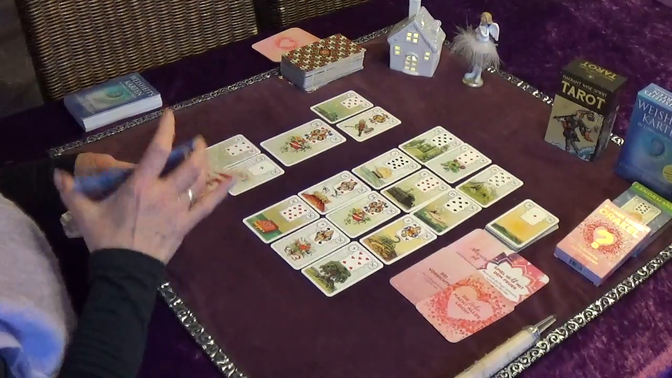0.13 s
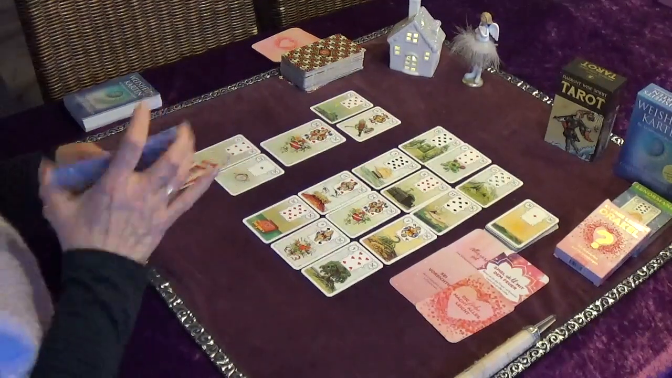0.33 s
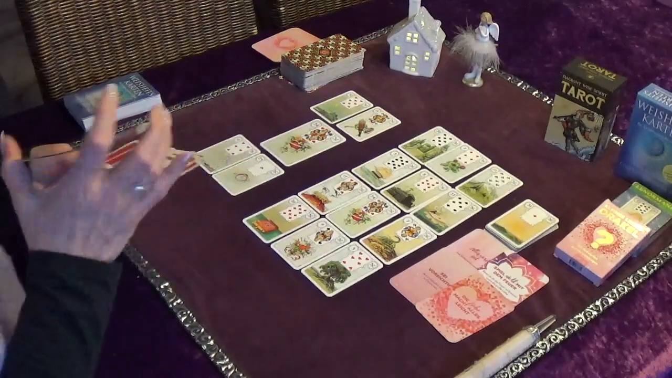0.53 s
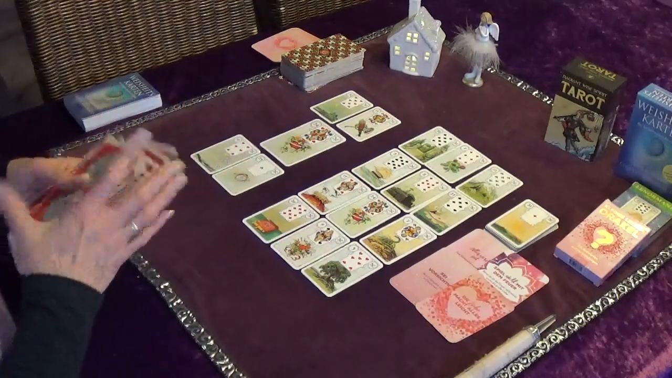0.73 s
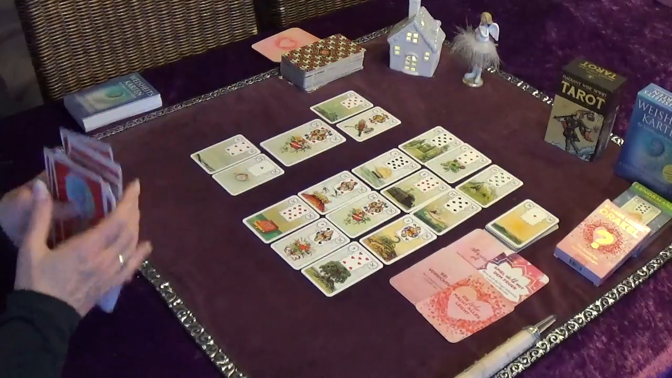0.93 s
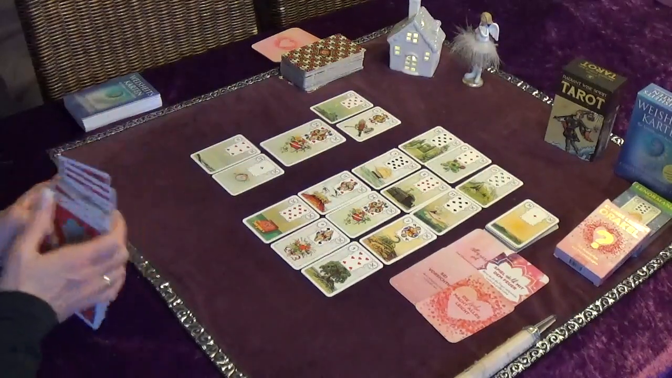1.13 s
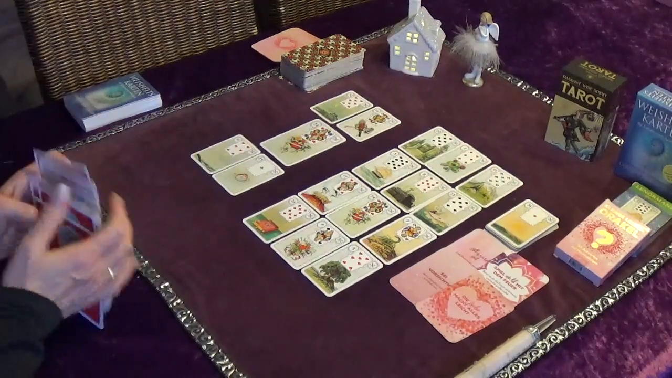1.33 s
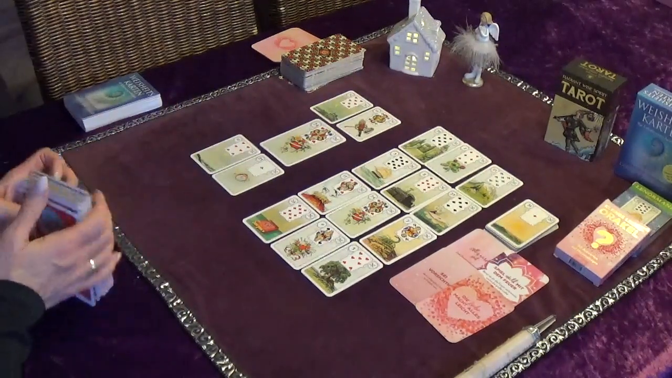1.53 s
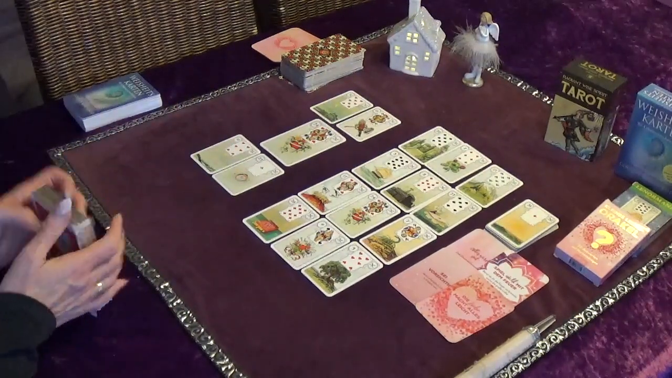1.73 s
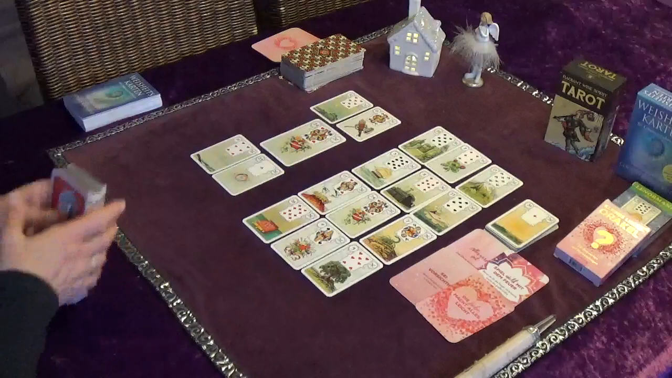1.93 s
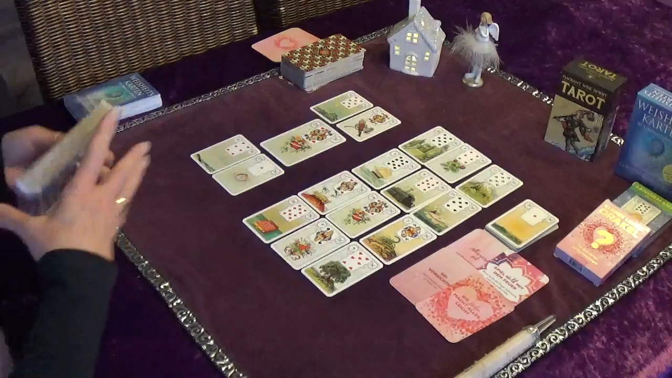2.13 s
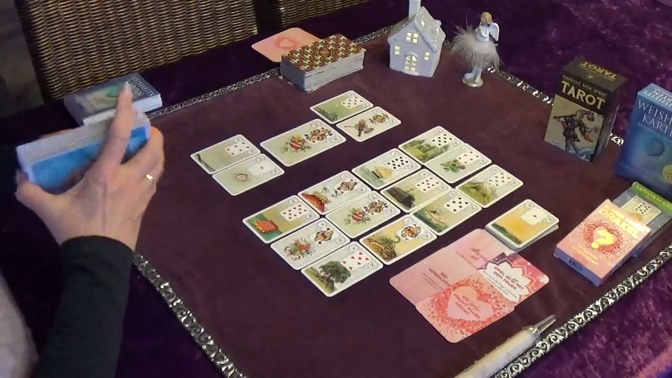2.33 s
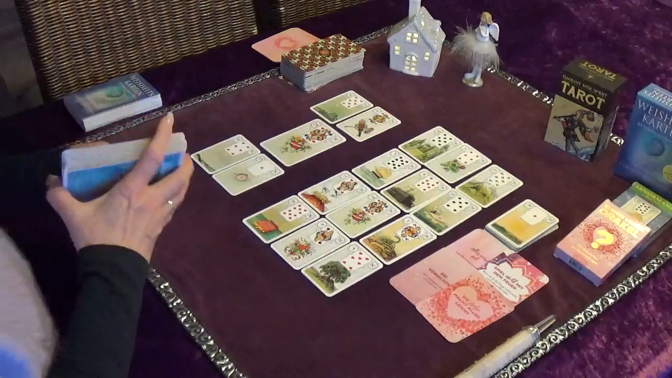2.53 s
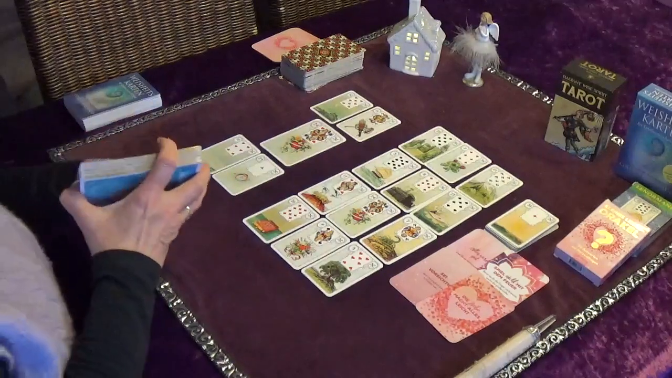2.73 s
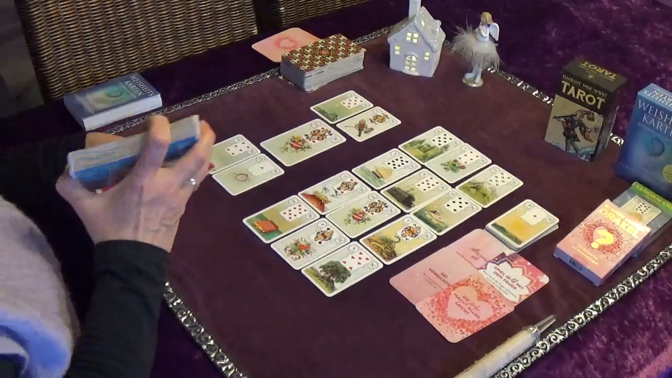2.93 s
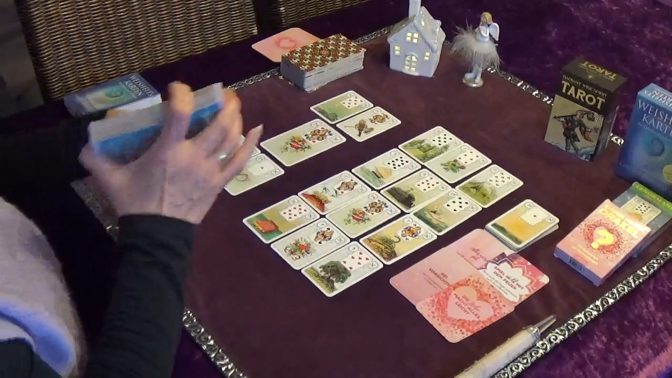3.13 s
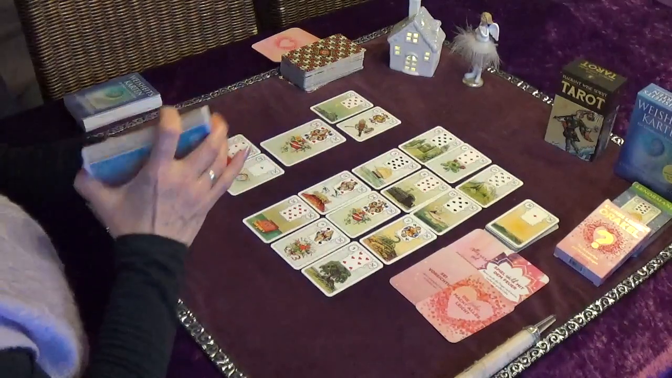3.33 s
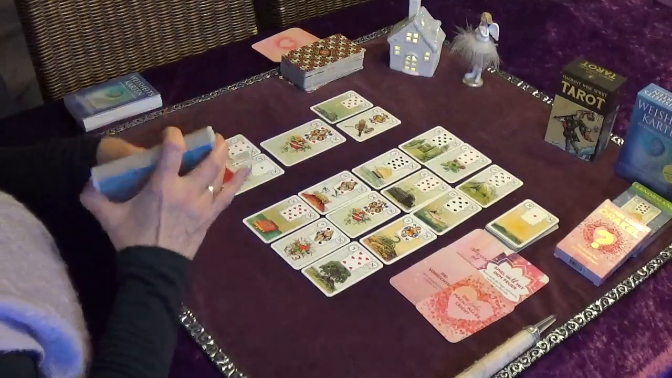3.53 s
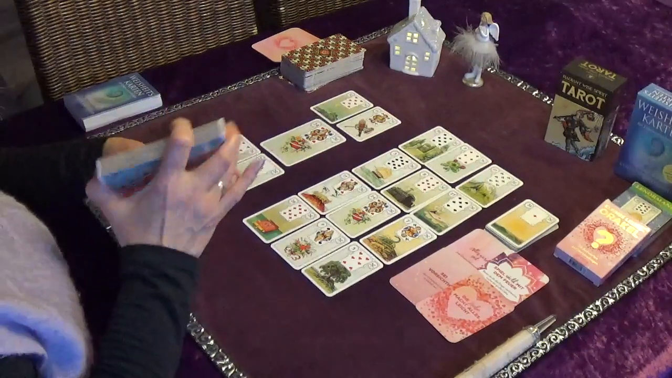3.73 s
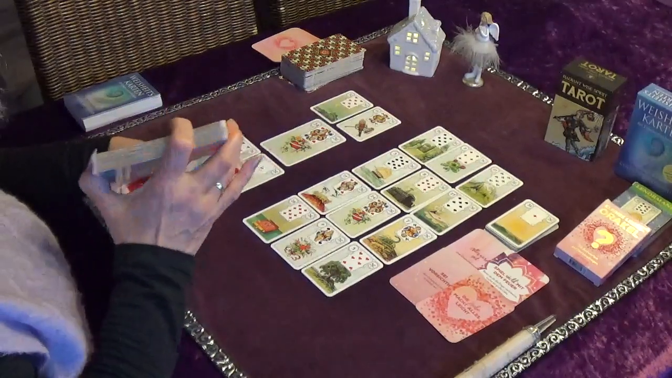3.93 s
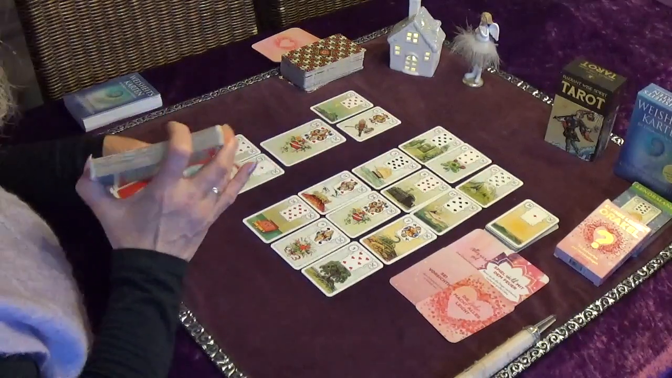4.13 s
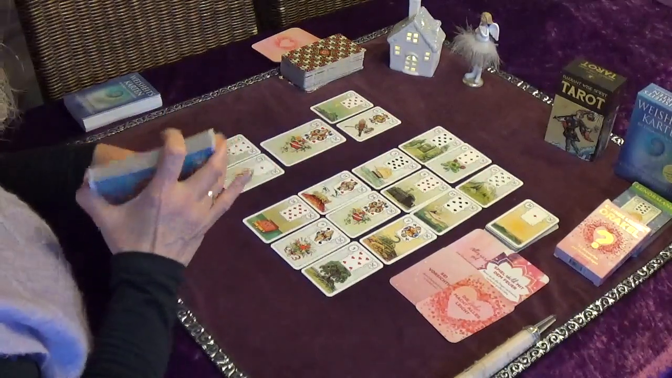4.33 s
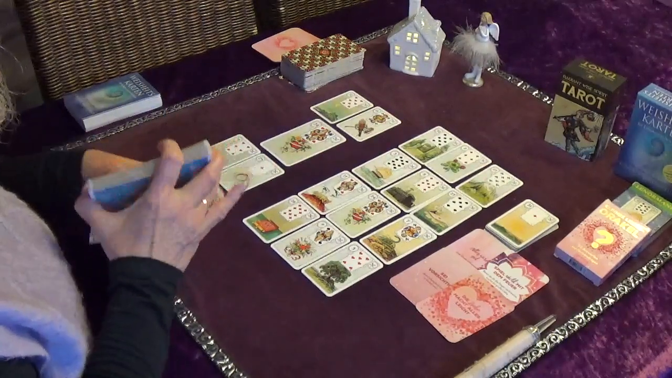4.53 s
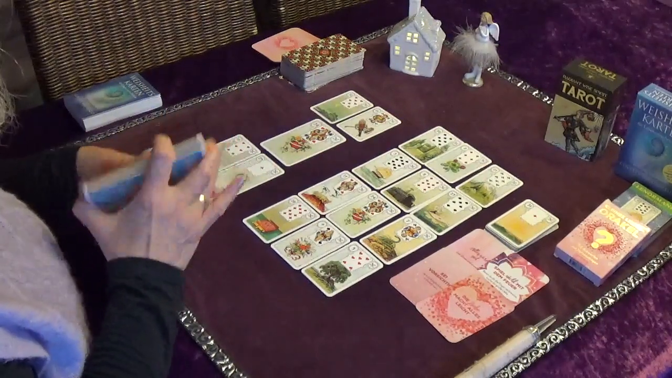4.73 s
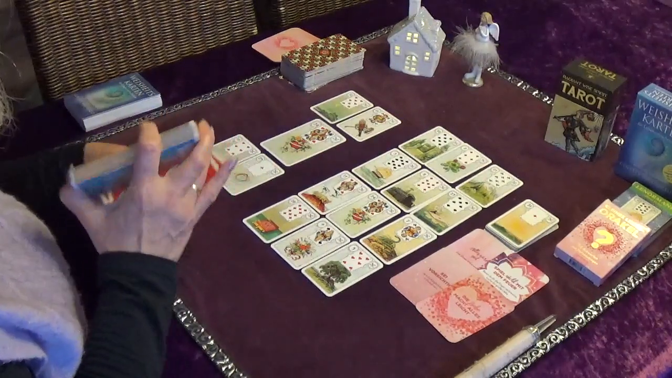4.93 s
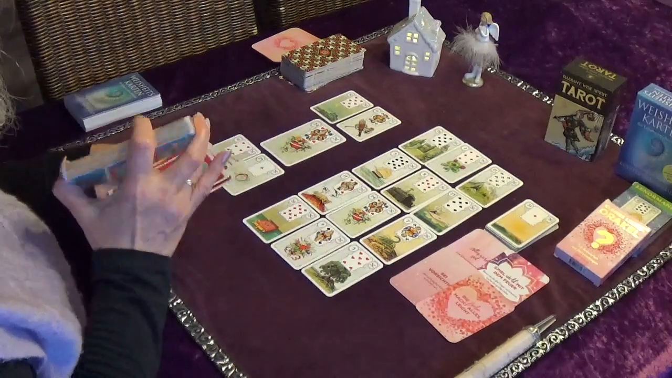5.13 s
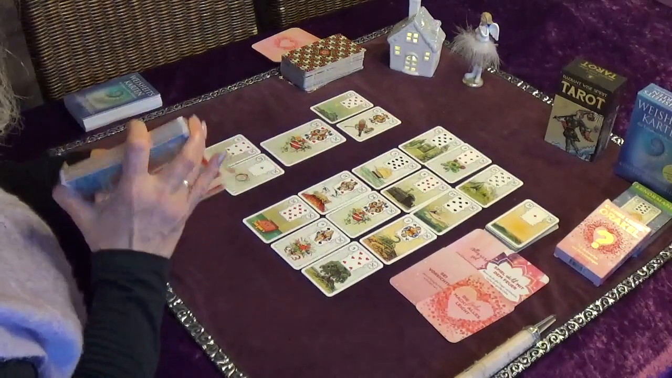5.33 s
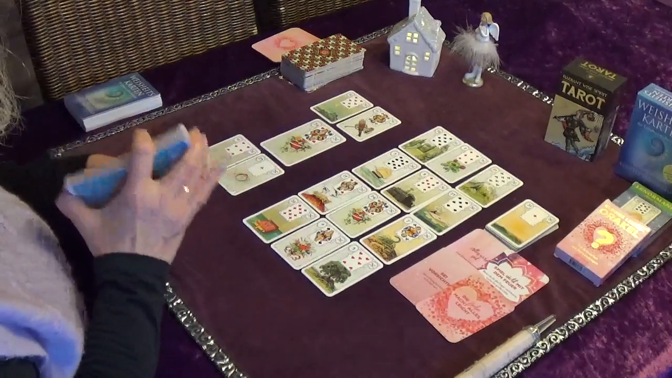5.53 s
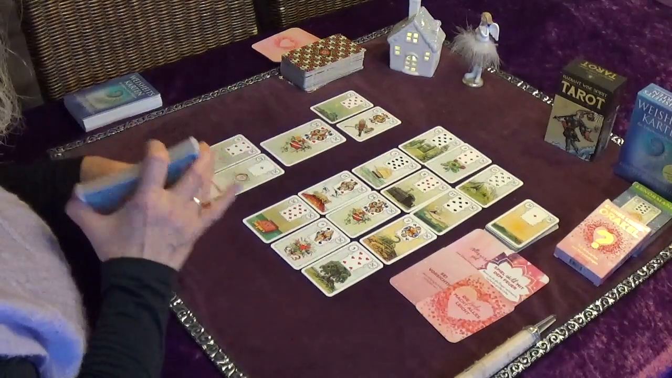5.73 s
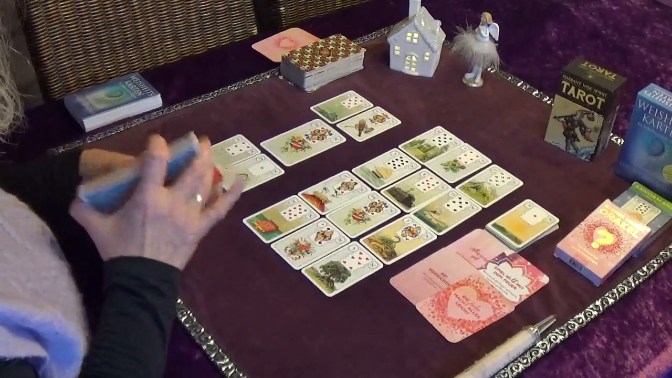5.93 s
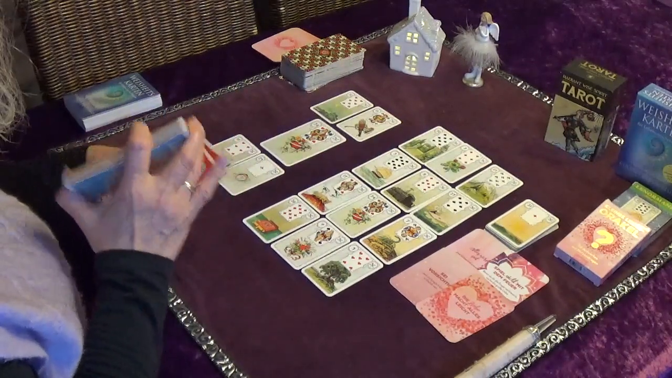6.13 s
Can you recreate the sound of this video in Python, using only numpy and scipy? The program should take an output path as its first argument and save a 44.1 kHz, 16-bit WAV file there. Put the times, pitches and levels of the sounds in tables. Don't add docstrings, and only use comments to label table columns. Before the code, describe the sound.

Hands shuffle a deck of cards overhand with crisp papery snaps, pause to knock it square on a table, then shuffle again in steady rhythm.

```python
import sys
import numpy as np
from scipy import signal
from scipy.fft import rfft, irfft, next_fast_len
from scipy.io import wavfile
from scipy.ndimage import map_coordinates

SR = 44100
rng = np.random.default_rng(int(sys.argv[2]) if len(sys.argv) > 2 else 0)


def invert_db(level):
    return 10 ** (np.asarray(level, dtype=float) / 20)


def master(y):
    cut = np.clip(np.atleast_2d(y).T, -1, 1)
    pcm = np.round(cut * 32767)
    wavfile.write(sys.argv[1], SR, pcm.astype(np.int16))


N = 276590

# frequency in Hz, level in dB per Hz.
HISS_SPECTRUM = [(12, -21), (20, -3.5), (59, 0), (77, -4.5), (165, -13), (199, -0.5), (221, -8),
                 (463, -10.5), (542, -16.5), (3270, -21), (3830, -24), (7600, -25.5), (11000, -29.5),
                 (14300, -59), (22000, -120)]
# frequency in Hz, 60 dB decay time in seconds.
ROOM_DECAY = [(100, 1), (300, 0.49), (800, 0.49), (2000, 0.4), (5000, 0.34), (10000, 0.27)]
# frequency in Hz, side level relative to mid in dB.
DIFFUSE_WIDTH = [(60, -17), (200, -17), (350, -15), (630, -9), (1100, -6), (2000, -7), (4000, -7.5),
                 (10000, -5.5)]
# frequency in Hz, swell in seconds, 60 dB decay in seconds, level in dB.
ROOM_MODES = [(109.6, 0.03, 0.32, -17), (156.6, 0.02, 0.63, -28.5)]
# frequency in Hz, width in Hz, level in dB.
TABLE_MODES = [(225.6, 14, 5), (326, 17, 9.5), (490, 29, 3), (687, 49, 11), (996, 7.7, 4), (1252, 49, 8),
               (1523, 18, -1.5), (1642, 19, 8), (1900, 27, -19), (3100, 50, -14)]
# frequency in Hz, width in Hz, level in dB.
PALM_MODES = [(205, 137, -10.5), (438, 64, 1), (732, 120, -5), (1230, 132, -1)]
# frequency in Hz, level in dB per Hz.
KNOCK_SPECTRUM = [(60, -26), (120, -23), (300, -8), (700, -6), (1500, 5.5), (2200, 3.5), (3200, -4),
                  (4500, -21), (8000, -55)]
# frequency in Hz, level in dB per Hz.
CARD_SPECTRUM = [(290, -55), (500, -40), (547, 2.5), (786, -30), (883, -11), (1300, -10), (3220, -4),
                 (3960, -5), (8280, -7), (11000, -15), (14300, -69), (22000, -120)]
# frequency in Hz, level in dB per Hz.
SCRAPE_SPECTRUM = [(150, -12), (300, 5), (500, -17.5), (900, -4.5), (1800, -2.5), (2800, -19), (4500, -17)]
# start in seconds, peak in dB, early corner in dB relative to the peak,
# loss per packet in dB, thud below 500 Hz in dB.
KNOCKS = [
    (0.991, -15, -34, 1, 8),
    (1.398, -3, -23.5, 2, -0.5),
    (1.69, -4, -8.5, 1.57, 0),
]
PACKET_DELAYS = [0, .016, .039, .06, .075]
# time in seconds, peak in dB, card ring in Hz,
# draw length in seconds, draw hiss in dB.
DROPS = [(0.264, -21, 2420, 0.051, -34.5), (0.6887, -8, 4610, 0.0083, -38), (2.9305, -14, 2420, 0.022, -32),
         (3.1942, -15, 2880, 0.037, -33.5), (3.3513, -14, 2570, 0.0062, -45),
         (3.688, -8, 3200, 0.017, -24.5), (3.9225, -17, 1290, 0.016, -23.5),
         (4.1788, -9.5, 2700, 0.015, -24.5), (4.409, -7, 2380, 0.015, -21),
         (4.6587, -10, 2130, 0.011, -24.5), (4.9093, -8, 2210, 0.023, -27),
         (5.1542, -6.5, 2450, 0.022, -25.5), (5.382, -9, 2600, 0.024, -26),
         (5.6197, -12.5, 2260, 0.02, -21.5), (5.8695, -11, 2300, 0.026, -23), (6.107, -7, 2450, 0.011, -22)]
# time in seconds, peak in dB, card ring in Hz,
# rub in dB, glide in dB.
CATCHES = [(0.1221, -7, 3160, -24.5, -46), (0.3815, -6, 7660, -29.5, -36), (0.6569, -25, 1390, -32.5, -56),
           (3.0618, -18.5, 3350, -26, -45), (3.3023, -6.5, 4200, -31.5, -53),
           (3.5482, -9.5, 3840, -23, -34.5), (3.8011, -18, 2390, -31, -40), (4.0589, -4, 1580, -27, -39),
           (4.29, -13, 9800, -37, -44.5), (4.5431, -6.5, 3800, -22.5, -38), (4.7819, -11, 2680, -33.5, -37),
           (5.0263, -12.5, 5300, -21.5, -31.5), (5.2731, -9.5, 1440, -26.5, -54),
           (5.5038, -9, 5350, -26.5, -38), (5.7405, -7, 3540, -24.5, -39), (6.0112, -6, 2940, -39, -35.5),
           (6.2259, -22, 1460, -33, -30)]
# time in seconds, peak in dB, card ring in Hz,
# ring relative to the peak in dB.
REAR_EDGES = [(0.6978, -7.5, 2340, -1.5), (1.7053, -26, 3220, 21.5), (2.9362, -25.5, 2800, 14.5),
              (2.9383, -23.5, 910, 8.5), (3.2003, -29, 2700, 19), (3.211, -26, 5000, -9),
              (3.9267, -13.5, 1140, -3), (4.1879, -8.5, 1220, -11), (4.1936, -15.5, 3670, 6.5),
              (4.4167, -12, 2200, 2.5), (4.6663, -6, 6500, 4), (4.6723, -22, 5530, -4),
              (4.9163, -5.5, 1105, -6.5), (5.162, -5.5, 3360, -7), (5.3884, -14, 2780, -2),
              (5.6273, -4, 1350, -2.4), (5.8785, -9, 3250, -2.5), (6.1132, -6, 3540, -9),
              (6.119, -19, 2580, -7)]
# time in seconds, peak in dB, card ring in Hz,
# palm slap relative to the peak in dB.
FLICKS = [(0.119, -21, 4600, -26), (0.1493, -8.5, 6500, -21), (0.2088, -35, 6950, -26),
          (0.3939, -10, 4460, -35), (0.6689, -16.5, 7920, -20), (0.7333, -32.5, 2340, -1.5),
          (3.0778, -26, 3450, -2.5), (3.1093, -18.5, 4870, -35), (0.6924, -15, 2100, -5.5),
          (3.3767, -14.5, 1260, -31), (3.554, -7.5, 2730, -10), (3.8215, -10.5, 1760, -13.5),
          (4.0769, -25, 1120, -18), (4.1656, -21, 2540, -27), (4.2935, -21, 3270, -11),
          (4.3035, -22.5, 1410, -18), (4.3223, -25, 2330, -8.5), (4.794, -9.5, 1400, -22),
          (4.8219, -19.5, 2680, -17), (5.0576, -17.5, 1370, -15.5), (5.2571, -22, 2610, -16),
          (5.286, -4.5, 2310, -22), (5.3097, -31, 2780, -13), (5.375, -10.5, 3400, -28),
          (5.5007, -22, 2630, -26), (5.0206, -26, 7100, -14), (5.5262, -12.5, 4800, -15.5),
          (5.7708, -15, 4860, -22), (5.9805, -18.5, 1380, -13.5), (6.2583, -22.5, 2850, -10.5)]
# time in
# seconds, peak in dB, card ring in Hz.
TICKS = [(1.01, -25, 2430), (1.1186, -30, 3000), (1.2754, -40, 9300), (1.2832, -36, 7750),
         (1.398, -15.5, 2900), (1.857, -30, 5000), (0.5193, -14.5, 1740), (2.0725, -37, 6030),
         (2.2784, -35.5, 5000), (2.5164, -48, 1150), (2.7202, -41.5, 6140), (2.845, -40, 460)]
# start in seconds, length
# in seconds, hiss in dB, hiss colour in Hz.
BRUSHES = [(0.201, 0.015, -24.5, 5370), (0.497, 0.017, -27, 6000), (0.866, 0.016, -32.5, 5400),
           (0.904, 0.038, -32.5, 6100), (0.996, 0.056, -36.5, 2550), (1.046, 0.019, -37, 9200),
           (1.109, 0.057, -39, 3100), (1.262, 0.019, -46, 8100), (1.307, 0.032, -49, 9000),
           (1.4, 0.0063, -30, 3400), (1.456, 0.034, -35.5, 6000), (1.613, 0.026, -51.5, 6000),
           (1.683, 0.02, -39, 3000), (1.796, 0.036, -44.5, 6000), (1.846, 0.049, -44, 6000),
           (2.038, 0.029, -45, 8800), (2.063, 0.015, -46, 4580), (2.281, 0.012, -42, 5330),
           (2.337, 0.025, -52, 6200), (3.095, 0.025, -32, 4760), (3.631, 0.021, -29, 8200),
           (3.809, 0.02, -20, 6460), (4.054, 0.0071, -25, 7560), (5.042, 0.014, -23, 9500),
           (5.844, 0.028, -22, 9300), (5.513, 0.021, -25.5, 6400), (6.212, 0.017, -28.5, 6800),
           (5.57, 0.018, -45, 8700), (5.972, 0.0093, -26, 3860)]
# start in seconds, length in seconds, level in dB, colour in Hz.
DRAGS = [(0.129, 0.035, -31, 1360), (0.274, 0.045, -48, 2300), (0.521, 0.052, -42, 1730),
         (0.7, 0.048, -37, 2100), (0.749, 0.19, -43.5, 2230), (1.894, 0.11, -46.5, 1460),
         (2.802, 0.09, -42, 2320), (2.942, 0.03, -50, 950), (3.554, 0.047, -25, 1960),
         (3.834, 0.05, -30, 1900), (4.069, 0.041, -32, 1710), (4.562, 0.0086, -27, 2010),
         (5.268, 0.0086, -23, 1410), (5.295, 0.06, -29.5, 1920)]


def unit(x):
    return x / np.sqrt(np.mean(x ** 2) + 1e-20)


def along(points, hz):
    f, value = np.transpose(points)
    return np.interp(np.log(hz + 1), np.log(f + 1), value)


def filtered(x, response):
    size = next_fast_len(x.shape[-1] + 8192)
    spectrum = rfft(x, size) * response(np.fft.rfftfreq(size, 1 / SR))
    return irfft(spectrum, size)[..., :x.shape[-1]]


def resonances(modes):
    def response(f):
        total = 0
        for k, (centre, width, db) in enumerate(modes):
            damping = 1j * f * width
            total = total + (-1) ** k * invert_db(db) * damping / (centre * centre - f * f + damping)
        return total
    return response


def noise(spectrum, size):
    return unit(filtered(rng.standard_normal(size), lambda hz: invert_db(along(spectrum, hz))))


def wobble(rate):
    knots = rng.standard_normal(int(N * rate / SR) + 4)
    return map_coordinates(knots, [np.arange(N) * rate / SR])


def add(track, s, sound):
    part = track[max(round(s * SR), 0):][:len(sound)]
    part += sound[:len(part)]


def spread(pair):
    side = filtered(pair[1], lambda hz: invert_db(along(DIFFUSE_WIDTH, hz)))
    return np.array([pair[0] + side, pair[0] - side])


def hush():
    return invert_db(-55) * spread(noise(HISS_SPECTRUM, size=(2, N)))


def room(tracks, build_s):
    wet = np.zeros((2, N))
    for x in tracks:
        _, t, z = signal.stft(rng.standard_normal((2, 3 * SR // 5)), SR, nperseg=256)
        hz = np.linspace(0, SR / 2, 129)
        decay = invert_db(-60 * t / along(ROOM_DECAY, hz)[:, None])
        tail = signal.istft(z * decay, SR, nperseg=256)[1]
        tail = tail * (1 - np.exp(-np.arange(tail.shape[1]) / SR / build_s))
        wet += signal.fftconvolve(x[None], tail / np.linalg.norm(tail[0]), axes=1)[:, :N]
    return spread(wet)


def boom():
    track, t = np.zeros(N), np.arange(SR // 2) / SR
    modes = np.zeros(len(t))
    for hz, swell, t60, db in ROOM_MODES:
        envelope = invert_db(db - 60 * t / t60) * (1 - np.exp(-t / swell))
        modes += envelope * np.sin(2 * np.pi * hz * t)
    for s, db, *_, thud_db in KNOCKS:
        add(track, s + 0.0307, invert_db(db + thud_db + 3.5) * modes)
    return track


def packets():
    corner_lead_s, first_bright_db, late_bright_db = 0.034, -12, -25.5
    rows = []
    for s, db, corner_db, loss_db, thud in KNOCKS:
        rows.append((s - corner_lead_s, db + corner_db, late_bright_db, thud + 6))
        for k, late in enumerate(PACKET_DELAYS):
            bright_db = late_bright_db if k else first_bright_db
            rows.append((s + late, db - k * loss_db, bright_db - 1.8 * thud, thud))
    return rows


def knocks(rows):
    blows, rattles, t = np.zeros((len(rows), N)), np.zeros(N), np.arange(SR // 6) / SR
    impulse = 1. * (np.arange(len(t)) == 40)
    pulse = filtered(impulse, lambda hz: invert_db(along(KNOCK_SPECTRUM, hz)))
    pulse = pulse / np.linalg.norm(pulse)
    for k, (s, db, bright_db, thud_db) in enumerate(rows):
        def wood(hz):
            bright = bright_db * hz ** 2 / (hz ** 2 + 2000 ** 2)
            thud = thud_db * 500 ** 2 / (hz ** 2 + 500 ** 2)
            return (0.84 + resonances(TABLE_MODES)(hz)) * invert_db(db + bright + thud)
        add(blows[k], s, filtered(pulse, wood))
        rattle = noise(KNOCK_SPECTRUM, size=len(t)) * invert_db(-30 * t / 0.051)
        add(rattles, s, filtered(rattle, wood))
    return blows, rattles


def swells():
    level, t = np.zeros(N), np.arange(SR // 25) / SR
    for s, *_, length, db in DROPS:
        add(level, s - length - t[-1], invert_db(db - 9.5 - 60 * t[::-1] / 0.06))
    return level * noise(CARD_SPECTRUM, size=N) * invert_db(4.0 * wobble(220))


def strokes():
    def colour(hz):
        return min(hz * np.exp(0.33 * rng.standard_normal()), .22 * SR)
    rows = []
    for s, *_, length, db in DROPS:
        rows.append((s - length, length / 2, db, -2, 6000))
        rows.append((s - length / 2, length / 2 + 0.0056, db + 3, -2, 3100))
    for s, *_, rub_db, glide_db in CATCHES:
        rows.append((s - 0.001026, 0.0149, rub_db, 2, colour(5000)))
        rows.append((s + .03, 0.057, glide_db, 0.5, colour(6000)))
    rows += [(s, length, db, -4.5, hz) for s, length, db, hz in DRAGS]
    rows += [(s, length, db, -5, hz) for s, length, db, hz in BRUSHES]
    return rows


def slides(rows, count):
    tracks, t = np.zeros((count, N)), np.arange(SR // 6) / SR
    hiss = noise(CARD_SPECTRUM, size=(len(rows), len(t)))
    scrape = noise(SCRAPE_SPECTRUM, size=(len(rows), len(t)))
    for k, (s, length, db, dark_db, hz) in enumerate(sorted(rows)):
        grip = np.clip(t / length, 0, 1)
        release = invert_db(-60 * np.maximum(t - length, 0) / 0.0037)
        air_gap = resonances([(hz, .45 * hz, 1.5)])
        gap = unit(filtered(hiss[k], lambda f: 0.8 * (hz / 6000) ** 0.94 + air_gap(f)))
        stroke = np.clip(grip / 0.47, 0, 1) * gap + invert_db(dark_db) * grip ** 1.14 * scrape[k]
        add(tracks[k % count], s - .003, invert_db(db - 6.0) * release * stroke)
    return tracks * invert_db(1.8 * wobble(150) + 2.2 * wobble(600))


def edges():
    follows = 0.41

    def slap(palm_db, db):
        return palm_db - (1 - follows) * db - 10 * follows
    rows = [(s, db, hz, slap(-17, db), 5) for s, db, hz, *_ in DROPS]
    rows += [(s, db, hz, slap(-29.5, db), -1.5) for s, db, hz, *_ in CATCHES]
    rows += [(s, db, hz, slap(-17, db), ring_db) for s, db, hz, ring_db in REAR_EDGES]
    rows += [(*row, 0) for row in FLICKS]
    rows += [(*row, -40, 5.5) for row in TICKS]
    return rows


def snaps(rows, count):
    tracks, t = np.zeros((count, N)), np.arange(SR // 25) / SR
    paper = noise(CARD_SPECTRUM, size=(len(rows), len(t)))
    slap = unit(filtered(invert_db(-60 * t / 0.00095), resonances(PALM_MODES))) * invert_db(-12)
    for k, (s, db, hz, slap_db, ring_db) in enumerate(sorted(rows)):
        crack = .5 * paper[k] * (invert_db(-60 * t / 0.007) + 0.38 * invert_db(-60 * t / 0.013))
        crack = filtered(crack, lambda f: 0.49 + 0.55 / (1 + 1j * f / (2.14 * hz)) ** 2)
        envelope = invert_db(-60 * t * hz / 8) * (1 - np.exp(-t * hz * 3))
        ring = 1.3 * np.sin(2 * np.pi * hz * t) * envelope
        add(tracks[k % count], s, invert_db(db) * (crack + invert_db(ring_db) * ring + invert_db(slap_db) * slap))
    return tracks


def earlier_snap():
    def colour(hz):
        scrape = invert_db(-7 + along(SCRAPE_SPECTRUM, hz))
        return scrape + invert_db(along(CARD_SPECTRUM, hz)) + invert_db(18 + along(HISS_SPECTRUM, hz))
    return filtered(1. * (np.arange(300) == 150), colour)


def scene():
    cards = snaps(edges(), count=8) + slides(strokes(), count=8)
    blows, rattles = knocks(packets())
    cards[0] += swells()
    direct = cards.sum(0)
    cards[1, :300] += earlier_snap()
    near = direct * invert_db([[.4], [-.4]]) + invert_db(-5) * room(cards, build_s=0.00067)
    far = invert_db(-5.0) * rattles + invert_db(-3.0) * blows.sum(0)
    far = far + invert_db(23.5) * room(blows, build_s=0.0024) + boom()

    def thin(hz):
        return (1j * hz / (1j * hz + 110)) ** 2
    return filtered(near + far, thin) + hush()


def roll_off(x):
    return signal.sosfilt(signal.butter(12, 12330, fs=SR, output="sos"), x)


def record(dry):
    rounded = dry / (1 + np.abs(dry / .68) ** 4) ** (1 / 4)
    mix = filtered(rounded, lambda hz: 1 / (1 + (hz / 11000) ** 55))
    return roll_off(mix)


dry = scene()
out = record(dry)
master(out)
```